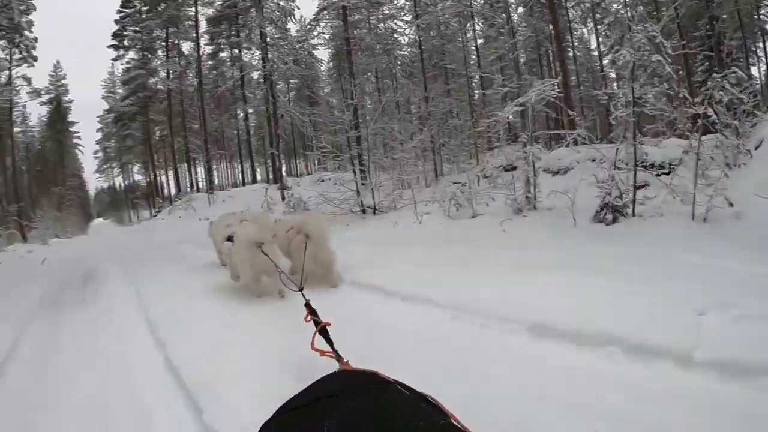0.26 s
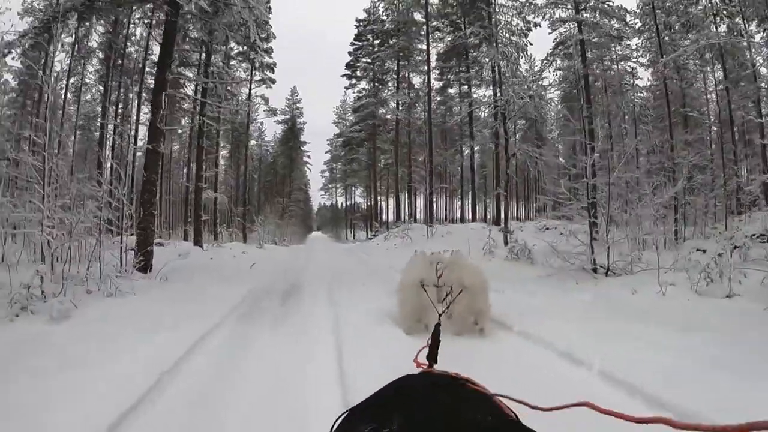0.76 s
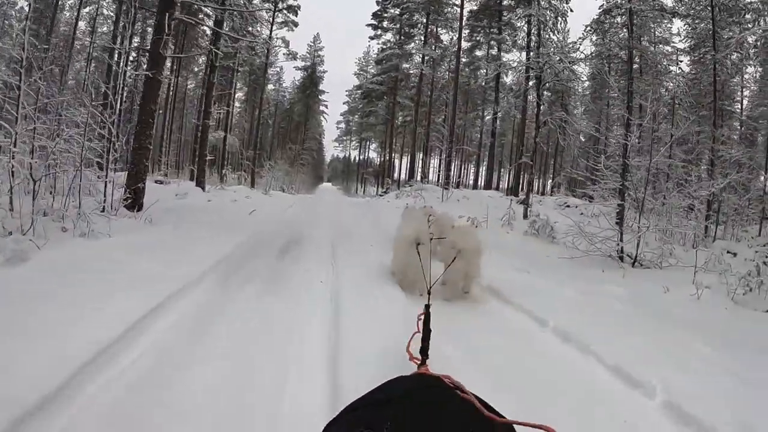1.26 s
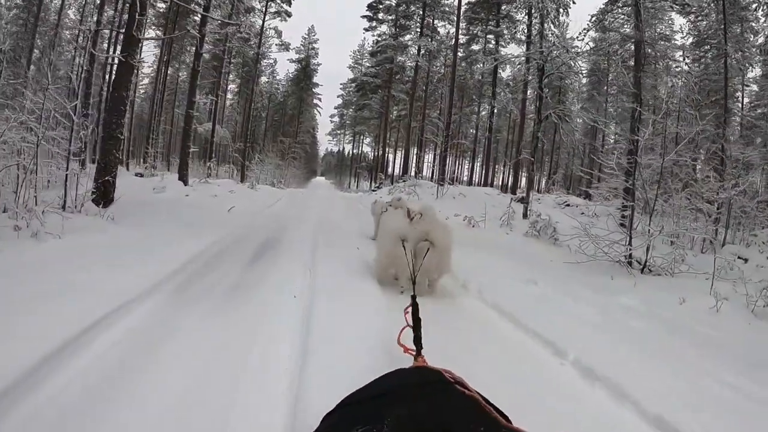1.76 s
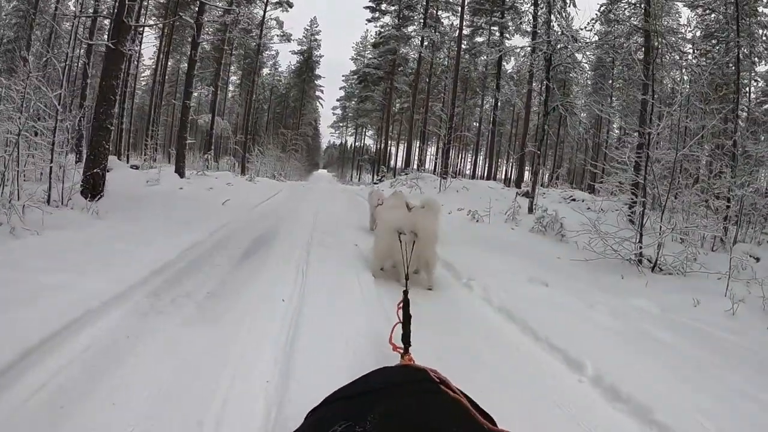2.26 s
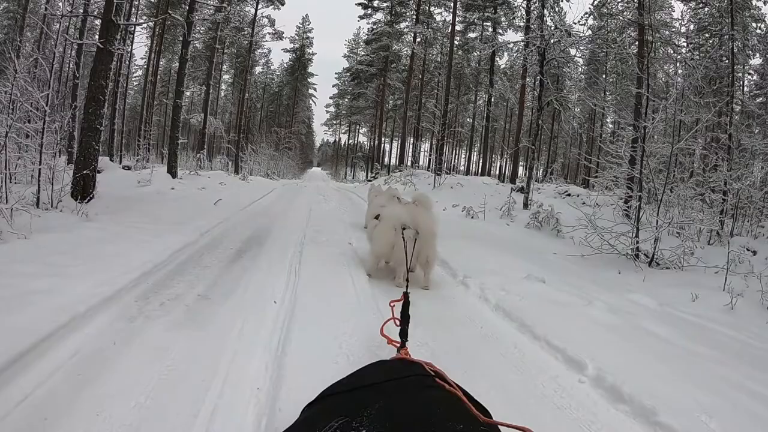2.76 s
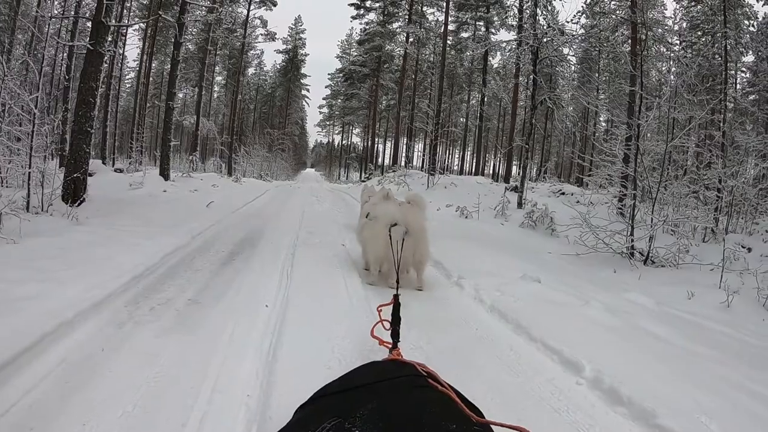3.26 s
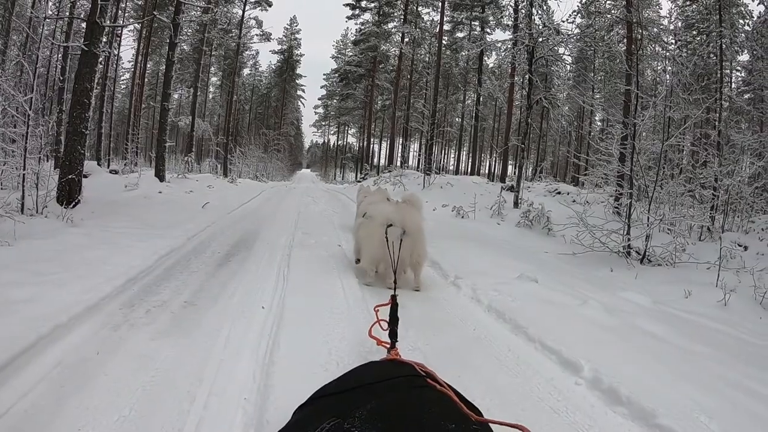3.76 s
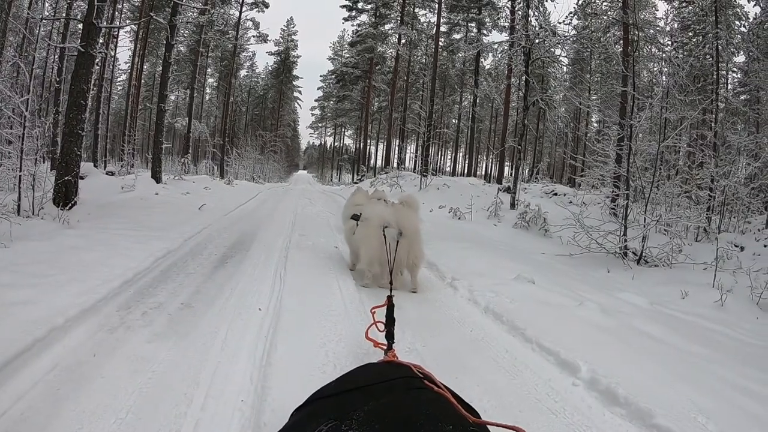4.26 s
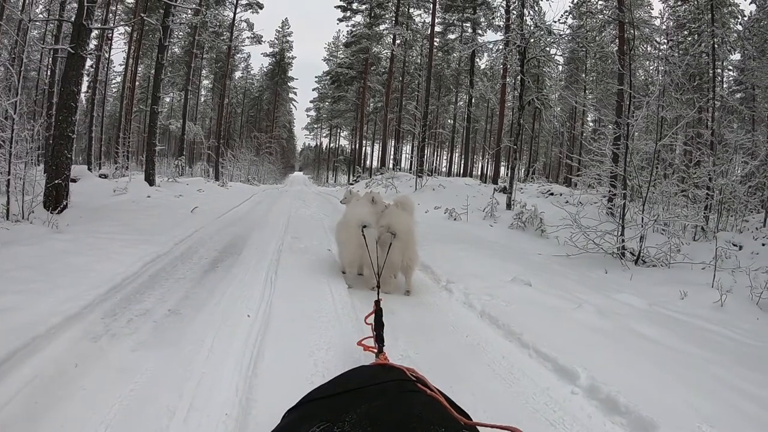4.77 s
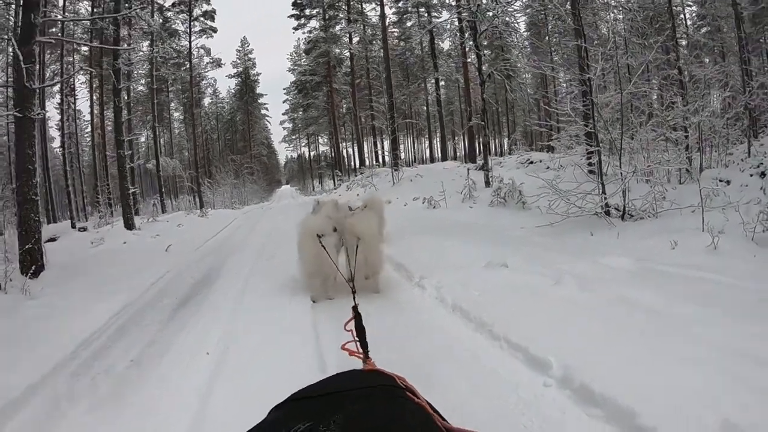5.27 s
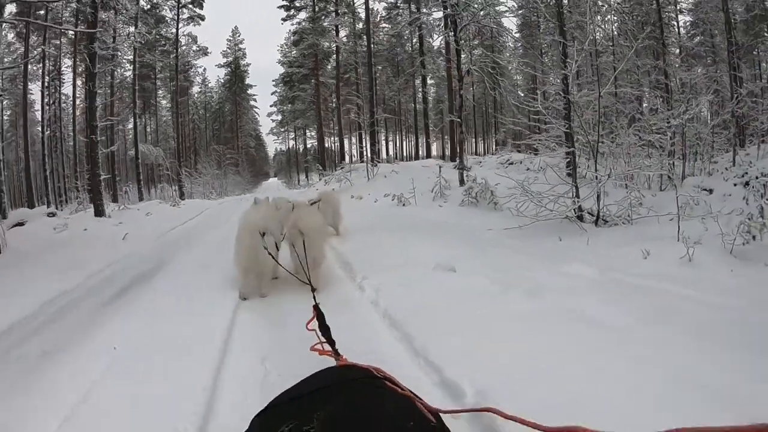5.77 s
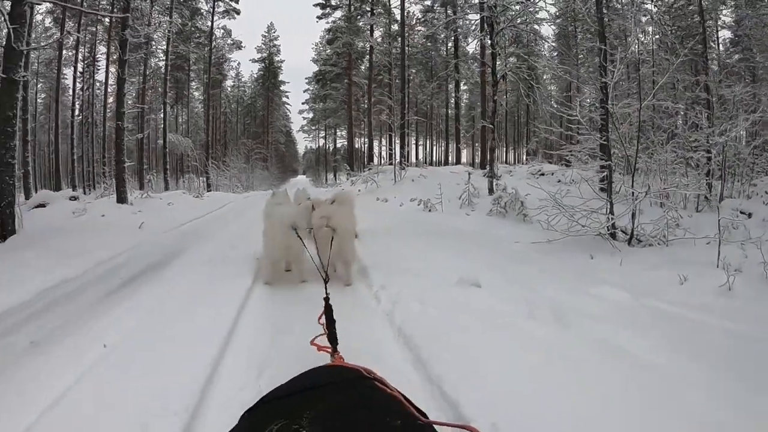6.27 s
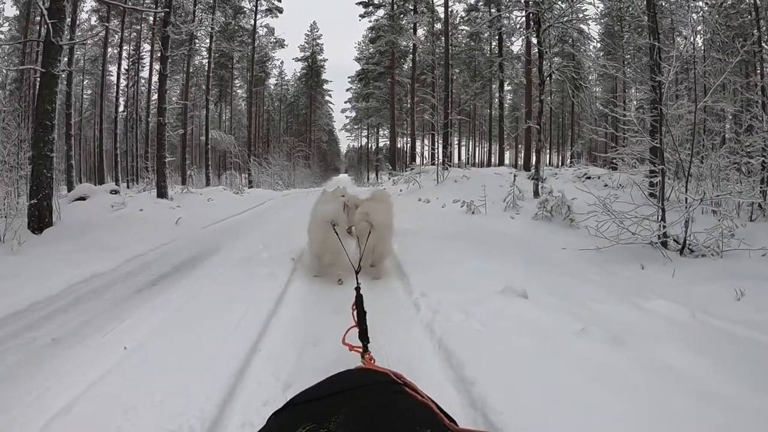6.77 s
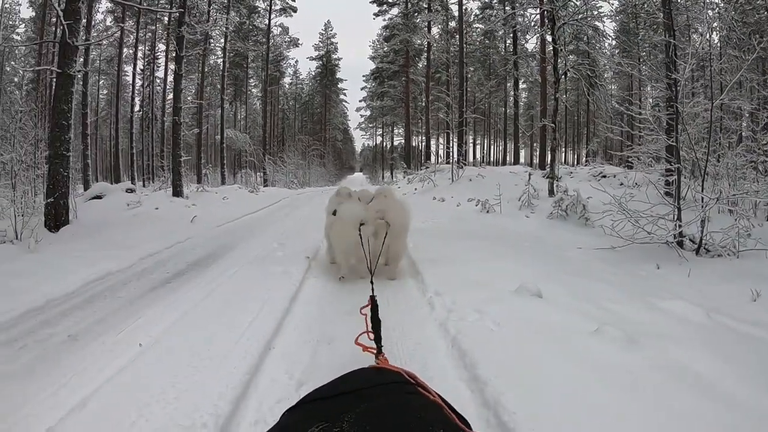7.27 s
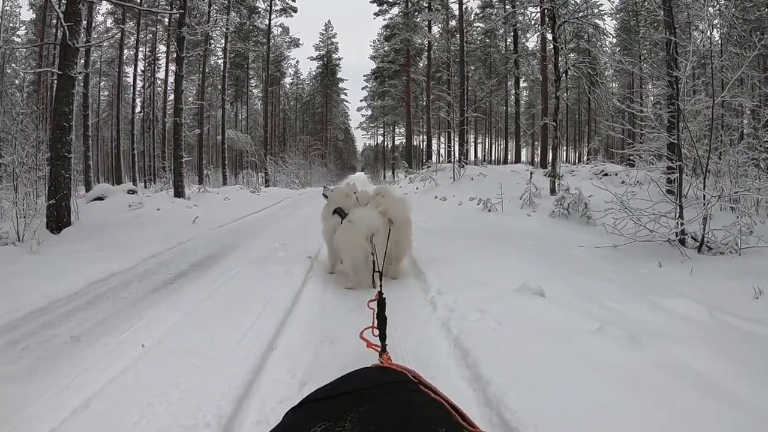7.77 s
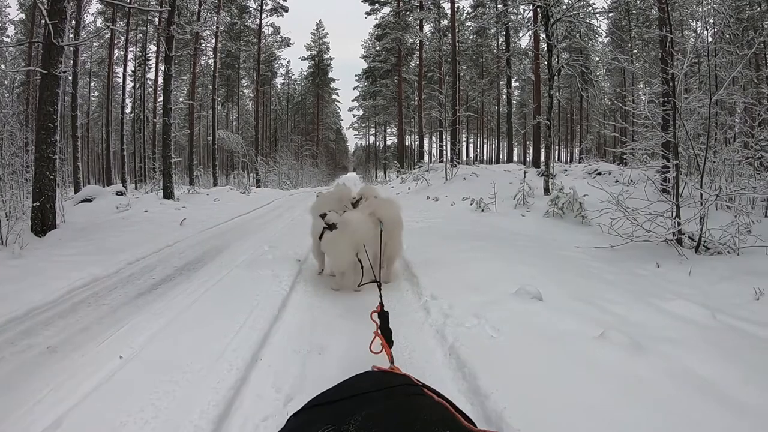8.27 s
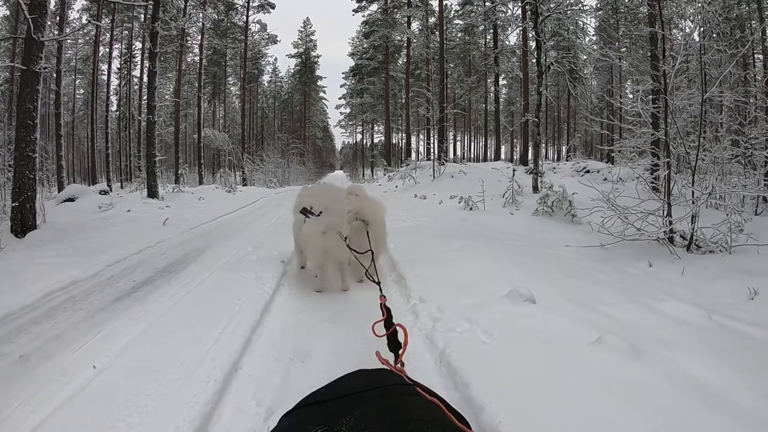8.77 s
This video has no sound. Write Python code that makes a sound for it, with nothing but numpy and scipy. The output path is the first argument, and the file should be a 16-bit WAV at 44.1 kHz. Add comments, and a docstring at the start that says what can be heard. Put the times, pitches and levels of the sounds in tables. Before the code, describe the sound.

Close, dry mono sound from a sled on packed forest snow, with no echo and barely audible air. At 0-0.5 s the runners grind and hiss strongly, with a brief snow squeak, creaking and a deep deck boom. Hollow knocks and a sharper crack hit around 0.7 s; short scrapes follow near 1 and 1.3 s. At 1.8-2.2 s come a thump, hollow knock, tick and small metallic clink. Around 3 s, dry knocks, a crack and woody stick-slip creaks cluster. From 3.2 to 4.9 s friction is thin, with brief bites and light bumps. It swells at 5.3-6.2 s with rough low snow groans and booming scrapes. A creak sounds near 6.5 s, then the loudest splitting cracks and thuds at 7.1-7.3 s. Afterwards it quiets: a tiny brush at 7.8, soft knock at 8, tick and clink at 8.2, final knock and scuff around 8.7.

```python
"""Sled runners grind and hiss over packed snow on a forest road, pulled by two dogs and heard from the sled.
Friction is filtered random grains of breaking snow; their chatter drives damped modes of deck and frame.
Bumps are pulse trains that boom in the deck and rock the load. Short narrow bands of rough noise are
snow groans and squeaks, the hollow bodies of two knocks and a high brushing rub. The frame creaks by
stick-slip, and knocks and cracks as rasps drive its modes; towline fittings tick and clink in faint air."""
import sys
import numpy as np
from scipy import signal
from scipy.fft import rfft, irfft, next_fast_len
from scipy.io import wavfile

SR = 44100
rng = np.random.default_rng(int(sys.argv[2]) if len(sys.argv) > 2 else 0)


def int16_out(signal):
    """Quantize to a 16-bit WAV file."""
    q = np.round(np.clip(np.atleast_2d(signal).T, -1, 1) * 32767)
    wavfile.write(sys.argv[1], SR, q.astype(np.int16))


N = 398223
T = np.arange(N) / SR  # time in s

# modes of the deck: f/Hz, width/Hz, relative level/dB
DECK_MODES = [(137.4, 3.4, -3.5), (157.9, 13.2, 3.5), (184.8, 12.4, 12), (206.1, 8.9, 8), (266, 17, -24)]
# modes of the hollow frame: f/Hz, width/Hz, relative level/dB
FRAME_MODES = [(295.5, 43, 6), (480.2, 59.6, 6.5), (596.7, 19.2, 7), (703, 4.9, -1)]
# modes of the runners: f/Hz, width/Hz, relative level/dB
RUNNER_MODES = [(1336, 216, 6.3), (1668, 37, 4), (1830, 46, 3.2)]
# modes of the tubes: f/Hz, width/Hz, relative level/dB
TUBE_MODES = [(3953, 120, -0.84), (4400, 160, -0.69), (5920, 170, -2.5)]
# rocking of the load on its springy frame: f/Hz, width/Hz, relative level/dB
ROCK_MODES = [(36, 7, 0)]
# spectrum of a dry snap: f/Hz, relative level/dB per Hz
SNAP_SPECTRUM = [(300, 11.5), (1900, 13.5), (3100, 5), (4400, 5.5), (9000, -8), (12000, -63)]


def gain_of(db):
    """Level to amplitude: 20 dB is a factor of ten."""
    return 10 ** (np.asarray(db) / 20)


def evened(x):
    """Normalises the mean power: rms 1."""
    return x / np.sqrt(np.mean(x ** 2) + 1e-20)


def peaked(x):
    """Normalises the greatest excursion: peak 1."""
    return x / (abs(x).max() + 1e-20)


def add(mix, s, sound):
    """Superposes a sound from time s on, or from 0 if s is negative."""
    part = mix[max(round(s * SR), 0):][:len(sound)]
    part += sound[:len(part)]


def colour(x, points, size=4096):
    """Minimum-phase filtering: the given spectrum from a causal response, so that attacks stay sharp."""
    hz, db = np.transpose(points)
    log_hz = np.log(abs(np.fft.fftfreq(size, 1 / SR)) + 1)
    log_gain = np.log(gain_of(np.interp(log_hz, np.log(hz), db)))
    # the phase follows from the log gain by the Hilbert transform
    taps = np.fft.ifft(np.exp(np.conj(signal.hilbert(log_gain)))).real
    return signal.oaconvolve(x, taps[:size // 2])[:len(x)]


def ring(x, modes, size=12000):
    """Modal resonance: the force x drives damped modes; above the top mode inertia limits the motion."""
    t = np.arange(size) / SR
    response = np.zeros(size)
    for hz, width, db in modes:
        decay = np.exp(-np.pi * width * t)
        response += gain_of(db) * width * decay * np.cos(2 * np.pi * hz * t)
    inertia = signal.butter(2, min(1.5 * modes[-1][0], SR / 3), fs=SR)
    return signal.oaconvolve(x, signal.lfilter(*inertia, response))[:len(x)]


def rattle(x, size=1500):
    """High modal density: many close, short-lived upper modes smear each click and comb its spectrum."""
    decay_s = 0.005
    tail = rng.standard_normal(size) * np.exp(-np.arange(size) / SR / decay_s)
    response = gain_of(-4) * tail / np.sqrt(decay_s * SR / 2)
    response[0] = 1  # the direct click
    return signal.oaconvolve(x, response / np.linalg.norm(response))[:len(x)]


def wander(fast_hz, size=N):
    """Band-limited random process, about rms 1, with changes mostly near and below fast_hz."""
    span = next_fast_len(max(size, SR))
    ratio = np.fft.rfftfreq(span, 1 / SR) / fast_hz
    spectrum = rfft(rng.standard_normal(span)) * ratio / (1 + ratio ** 4)
    return evened(irfft(spectrum, span))[:size]


def grains(per_s, spread_db):
    """Shot noise of snow crystals giving way: random clicks, a few of them much larger."""
    height = gain_of(spread_db * np.minimum(rng.exponential(1, N), 4))
    return evened(height * rng.choice([-1., 1.], N) * (rng.random(N) < per_s / SR))


def shifting(force, modes):
    """Moving excitation: the contact point shifts along the runner, so the driven modes take turns."""
    return evened(sum(ring(force, [mode]) * gain_of(3.5 * wander(fast_hz=9)) for mode in modes))


def ride():
    """Incoherent sources add in power: glide, scrapes and swishes give boom, grinding and hiss amplitudes."""
    # glide under everything: t/s, deck boom level/dB (lowered in runners), grinding level/dB
    glide = [(0.0, -24, -48), (0.9, -37, -52), (1.6, -29, -45), (2.1, -29, -48.5), (2.4, -40.5, -57.5),
             (2.95, -29, -53), (3.24, -47, -66.5), (3.499, -55.5, -61.5), (3.8, -43.5, -59.5),
             (4.451, -51, -57.5), (4.96, -30, -53), (5.41, -37, -56.5), (5.8, -26, -47), (6.08, -30.5, -51),
             (6.8, -43.5, -62.5), (7.27, -25.5, -48.5), (7.41, -48.5, -65.5), (7.749, -55, -64),
             (8.1, -39.5, -56), (9.03, -46.5, -60)]
    # runners bite as the dogs pull: t/s, length/s, grinding level/dB, boom and hiss relative to it/dB
    scrapes = [(0.0, 0.26, -42.5, 3, -11), (0.152, 0.26, -39.5, 21, -6), (0.971, 0.14, -45.5, 16, -3.5),
               (1.323, 0.21, -43.5, 15, -10.5), (2.642, 0.22, -50, -9, -4), (3.628, 0.26, -49.5, 6, -5),
               (4.009, 0.071, -48.5, 12, -4.5), (4.228, 0.068, -46, 16, -9), (4.44, 0.03, -47, 25.5, -0.5),
               (4.533, 0.25, -50.5, 10.5, -3.5), (5.516, 0.095, -45, 17, 3.5), (5.558, 0.19, -39, 22, -2.5),
               (6.467, 0.21, -51.5, 26.5, -9.5), (7.127, 0.16, -38.5, 6, -10), (8.266, 0.058, -46, 3, -7),
               (8.736, 0.16, -50.5, 11, -12)]
    # loose snow swishes aside: t/s at the middle, length/s at half amplitude, hiss level/dB
    swishes = [(0.355, 0.17, -40.5), (3.35, 0.11, -52), (4.18, 0.17, -54), (6.166, 0.11, -53),
               (7.814, 0.036, -41.5)]
    glide_hiss_db = -5.5  # loose snow hisses in step with the grinding
    bite_s, sag_db_per_s, release_s = 0.013, 11, 0.021  # quick onset, easing off, dying away
    swish_boom_db, swish_grind_db = -4, -7.5  # a swish also stirs the deck and grazes the packed snow
    s, boom_db, grind_db = np.transpose(glide)
    levels = (boom_db, grind_db, grind_db + glide_hiss_db)
    power = np.array([gain_of(np.interp(T, s, db)) for db in levels]) ** 2
    for start, length, db, boom_db, hiss_db in scrapes:
        t = np.arange(0, length + 6 * release_s, 1 / SR)
        release = np.exp(-np.maximum(t - length, 0) / release_s)
        push = np.minimum(t / bite_s, 1) * gain_of(db - sag_db_per_s * t) * release
        for layer, share_db in zip(power, (boom_db, 0, hiss_db)):
            add(layer, start, (gain_of(share_db) * push) ** 2)
    for middle, length, db in swishes:
        swell = gain_of(db) * signal.windows.hann(round(2 * length * SR))
        for layer, share_db in zip(power, (swish_boom_db, swish_grind_db, 0)):
            add(layer, middle - length, (gain_of(share_db) * swell) ** 2)
    return np.sqrt(power)


def runners():
    """Friction noise: snow breaks in clumps and shakes the modes of deck and frame; loose snow hisses."""
    # grinding of packed snow: f/Hz, relative level/dB per Hz
    crunch_spectrum = [(450, -3.5), (1900, -5.5), (2800, -28.5), (5000, -31.5), (11000, -66.5)]
    # hiss of loose snow: f/Hz, relative level/dB per Hz
    powder_spectrum = [(200, -12.5), (900, 7.5), (2100, 3), (3100, 0.5), (4100, 3), (6700, -0.5),
                       (10000, -22), (12000, -57)]
    hiss_tube_db = -11  # how much the sliding snow rings the tubes
    boom, grind, hiss = ride()
    grip = wander(fast_hz=31.0)  # the runners catch and let go
    shake = evened(ring(rng.standard_normal(N) * gain_of(2 * grip), DECK_MODES))
    rocking = evened(ring(rng.standard_normal(N), ROCK_MODES))
    sway = gain_of(-13.0 - 1.04 * T) * boom ** .5 * grind ** 0.21 * rocking  # the load slowly settles
    breaks = grains(per_s=3000, spread_db=1.5) * gain_of(2 * grip)
    # the frame joins runners and deck
    hollow = gain_of(-5.0) * np.sqrt(boom * grind) * shifting(breaks, FRAME_MODES)
    crumbs = grains(per_s=3200, spread_db=4.5) * gain_of(0.75 * grip)
    crunch = gain_of(-2.5) * evened(rattle(colour(crumbs, crunch_spectrum)))
    scrape = gain_of(-2.5) * shifting(breaks, RUNNER_MODES) + crunch
    loose = grains(per_s=18000, spread_db=5.0) * gain_of(1.03 * grip)
    powder = evened(colour(loose, powder_spectrum))
    powder += gain_of(hiss_tube_db) * shifting(breaks, TUBE_MODES)
    return gain_of(-3.0) * boom * shake + sway + hollow + grind * scrape + hiss * powder


def air():
    """Stationary broadband noise: the faint steady rush of the winter forest."""
    # f/Hz, relative level/dB per Hz
    air_spectrum = [(200, 11.5), (1500, -37.5), (5500, -23), (11000, -55)]
    return gain_of(-70.5) * evened(colour(rng.standard_normal(N), air_spectrum))


def creaks():
    """Stick-slip: a strained joint slips unevenly; each slip snaps and rings four wood modes that bend."""
    # t/s, rms level/dB, f/Hz of the main mode, length/s, top wood mode relative level/dB
    creak_events = [(0.0, -41.5, 1292, 0.46, -25), (2.914, -43, 1250, 0.011, -16),
                    (2.995, -42.5, 1320, 0.023, -14), (3.025, -40, 1352, 0.06, -13),
                    (3.079, -40.5, 1410, 0.051, -25), (4.643, -53, 1315, 0.73, -13),
                    (6.463, -39.5, 1357, 0.19, -12.5), (7.144, -33.5, 1283, 0.024, 3),
                    (7.986, -41, 1350, 0.03, -28)]
    slips_per_s = 450  # before its random variation
    width_hz = 154  # of each wood mode
    low_db, middle_db = -1.5, 4  # lowest mode relative to the main one, middle mode above the top one
    grit_db = -8  # dry grit of the slips, relative to the main mode
    bend = 0.0174  # share by which the pitch wanders with the strain
    out = np.zeros(N)
    for s, db, hz, length, top_db in creak_events:
        size = round(length * SR)
        pace = slips_per_s * gain_of(4 * wander(fast_hz=150, size=size))
        strength = gain_of(4 * rng.standard_normal(size) + 2 * wander(fast_hz=40, size=size))
        # a slip falls wherever the running count reaches a whole number
        slips = np.diff(np.floor(np.cumsum(pace) / SR), prepend=-1) * strength
        force = np.pad(slips * np.hanning(size + 2)[1:-1] ** .25, (0, SR // 40))
        wood = gain_of(grit_db) * evened(rattle(colour(force, SNAP_SPECTRUM)))
        for ratio, mode_db in [(0.35, low_db), (1, 0), (1.39, top_db + middle_db), (1.82, top_db)]:
            mode = [(ratio * hz, width_hz, 0)]
            wood = wood + gain_of(mode_db) * evened(ring(ring(force, mode), mode))
        # reading the sound at a varying speed bends its pitch
        strain = 1 + bend * wander(fast_hz=10.0, size=len(wood))
        bent = np.interp(np.cumsum(strain), np.arange(len(wood)), wood)
        add(out, s, gain_of(db) * evened(bent))
    return out


def rough_bands():
    """Narrow-band noise: slow random amplitudes on a sinking carrier make a rough tone that swells and fades."""
    # snow groans and squeaks, the hollow bodies of two knocks (1.996 s, 8.007 s), a high brushing rub (7.811 s):
    # t/s at the middle, level/dB, f/Hz at the middle, length/s at half amplitude
    band_events = [(0.119, -23.5, 1720, 0.0072), (0.11, -40, 1700, 0.17), (0.581, -47, 680, 0.063),
                   (1.996, -29.5, 679, 0.018), (5.287, -38.5, 640, 0.079), (5.69, -44, 580, 0.099),
                   (5.763, -38.5, 720, 0.063), (6.09, -38.5, 530, 0.035), (6.202, -36, 512, 0.05),
                   (7.811, -45.5, 5940, 0.024), (8.007, -28, 292, 0.029)]
    width_hz, sag_hz_per_s = 147, 600
    out = np.zeros(N)
    for s, db, hz, length in band_events:
        swell = signal.windows.hann(round(2 * length * SR))
        t = np.arange(len(swell)) / SR - length
        lowpass = signal.butter(2, width_hz / 2, fs=SR)
        rough = signal.lfilter(*lowpass, rng.standard_normal((2, SR)))[:, -len(t):]
        turn = 2 * np.pi * np.cumsum(hz - sag_hz_per_s * t) / SR
        band = rough[0] * np.cos(turn) + rough[1] * np.sin(turn)
        add(out, s - length, gain_of(db) * swell * evened(band))
    return out


def bumps(size=16000):
    """Forced vibration: a runner slips a few times in a row and booms the deck; the shove rocks the load."""
    # t/s, boom level/dB before the common gain, chatter f/Hz, rocking relative to the boom/dB
    bump_events = [(0.394, -18, 156, -2.5), (0.723, -20.5, 233.5, 3), (0.746, -25, 187, 4.5),
                   (1.781, -21.5, 210, -8), (2.119, -30, 217, -3.5), (3.098, -31, 193, -1.5),
                   (3.587, -25.5, 203, -16), (3.656, -29.5, 163, -14), (4.277, -29, 202, -17),
                   (5.847, -24, 239, -40), (5.977, -28, 199, -31), (6.594, -23, 186.6, -12),
                   (7.16, -25.5, 218, -27), (7.263, -20.5, 187, -7), (7.29, -20.5, 163.6, -18.5),
                   (7.949, -34, 206, -3.5)]
    # thud of the load against the deck: f/Hz, width/Hz, relative level/dB
    thud_modes = [(111.4, 6, 0)]
    thud_db = -5.5  # relative to the rocking
    judder_s = 0.029  # how long a runner chatters on a bump
    out, t = np.zeros(N), np.arange(size) / SR
    load = np.sin(np.pi * np.minimum(t / judder_s, 1))
    shove = t * np.exp(-t / 0.021)
    thud = peaked(ring(np.diff(shove, prepend=0), thud_modes))
    rocking = peaked(ring(shove, ROCK_MODES)) + gain_of(thud_db) * thud
    for s, db, hz, rock_db in bump_events:
        slips = load * np.exp(5.6 * np.cos(2 * np.pi * hz * t))  # narrow pulses at the chatter rate
        boom = peaked(ring(slips, DECK_MODES))
        add(out, s, gain_of(db) * (boom + gain_of(rock_db) * rocking))
    return gain_of(9.5) * out  # common gain


def rasp(rise_s, slip_s, size=6000):
    """Transient friction: a joint lets go in a few milliseconds of rough slipping, with a faint tail."""
    t = np.arange(size) / SR
    decay = np.exp(-t / slip_s) + gain_of(-35.0) * np.exp(-t / 0.024)
    return rng.standard_normal(size) * (1 - np.exp(-t / rise_s)) * decay


def blow():
    """Modal response to a rasp: hollow frame and deck, the runners, and a dry snap that rings the tubes."""
    rise_s, slip_s = 0.0013, 0.0079  # a loose joint rasps a little longer than a tight one
    snap_slip_s = 0.0035  # the dry snap is over before the rest of the rasp
    snap_tube_db = -13  # how much a snap rings the tubes
    force = rasp(rise_s, slip_s)
    hollow = peaked(ring(force, FRAME_MODES)) + gain_of(2.0) * peaked(ring(force, DECK_MODES))
    runner = peaked(ring(np.diff(force, prepend=0), RUNNER_MODES))  # a sharp blow favours the higher modes
    snap = peaked(rattle(colour(rasp(rise_s, snap_slip_s), SNAP_SPECTRUM)))
    snap = snap + gain_of(snap_tube_db) * peaked(ring(force, TUBE_MODES))
    return hollow, runner, snap


def knocks():
    """Impact on coupled parts: loose joints knock in the hollow frame and runners, with a dry snap."""
    # t/s, level/dB of the blow, dry snap relative to it/dB
    knock_events = [(0.552, -24.5, 1), (0.721, -17.5, -25), (0.738, -20.5, -8), (1.002, -25.5, -4),
                    (1.773, -21, -6.5), (1.993, -26.5, -9), (2.249, -23, -8.5), (2.941, -25, 5),
                    (2.965, -25, -25), (3.579, -25, -29), (4.244, -30.5, -1.5), (5.855, -25, -10),
                    (8.001, -39, -0.5), (8.637, -23.5, -13), (8.649, -30.5, 0)]
    runner_db = -10  # how much a knock rings the runners
    out = np.zeros(N)
    for s, db, snap_db in knock_events:
        hollow, runner, snap = blow()
        add(out, s, gain_of(db) * (hollow + gain_of(runner_db) * runner + gain_of(snap_db) * snap))
    return out


def cracks():
    """Sudden release of strain: a tight joint gives way in a hard split that rings the wood around it."""
    # the strained frame cracks as the sled lurches: t/s, level/dB before the shares below
    crack_events = [(0.724, -26), (0.739, -16.5), (2.94, -20), (6.623, -18.5), (7.102, -24), (7.161, -8.5),
                    (7.208, -15), (7.241, -16), (7.254, -7), (7.273, -8.5)]
    # wood around the joint: f/Hz, width/Hz, relative level/dB
    joint_modes = [(1240, 170, 14), (1730, 79, -16), (1864, 41, 0)]
    # splitting sound: f/Hz, relative level/dB per Hz
    split_spectrum = [(900, -20.5), (1300, 1.5), (1950, 1.5), (2900, -21), (4200, -11.5), (6500, -19.5),
                      (9000, -37), (12000, -80)]
    hollow_db, joint_db, split_db = -7.5, -10, -2.5
    out = np.zeros(N)
    for s, db in crack_events:
        hollow = blow()[0]
        force = rasp(rise_s=0.00033, slip_s=0.0044)
        wood = peaked(ring(force, joint_modes))
        split = peaked(rattle(colour(force, split_spectrum)))
        crack = gain_of(hollow_db) * hollow + gain_of(joint_db) * wood + gain_of(split_db) * split
        add(out, s, gain_of(db) * crack)
    return out


def ticks():
    """Transmitted impact: the towline fittings snap taut, and the frame answers with a hollow share."""
    # t/s, level/dB of the snap
    tick_events = [(1.972, -23), (2.12, -29), (2.803, -31), (2.958, -25), (4.429, -30.5), (6.265, -31),
                   (6.455, -33.5), (7.041, -35), (7.927, -34), (8.232, -24.5)]
    hollow_db = -4
    out = np.zeros(N)
    for s, db in tick_events:
        hollow, _, snap = blow()
        add(out, s, gain_of(db) * (snap + gain_of(hollow_db) * hollow))
    return out


def clinks():
    """Impulse response: the steel hook on the towline is tapped and rings briefly."""
    # t/s, peak level/dB
    clink_events = [(1.973, -31), (5.319, -42.5), (6.865, -49), (8.23, -34)]
    # f/Hz, width/Hz, relative level/dB
    hook_modes = [(8200, 85, 15)]
    out = np.zeros(N)
    tap = peaked(ring(signal.unit_impulse(SR // 4), hook_modes))
    for s, db in clink_events:
        add(out, s, gain_of(db) * tap)
    return out


def scene():
    """Superposition of direct sound: everything is close and dry, since snow gives no echo."""
    steady_and_rough = runners() + air() + creaks() + rough_bands()
    blows = bumps() + knocks() + cracks() + ticks() + clinks()
    return (steady_and_rough + blows)[None]


def record(dry):
    """Band limits and soft saturation: sheds the deepest rumble, rounds off hard blows, cuts the top."""
    x = signal.sosfilt(signal.butter(2, 24, "highpass", fs=SR, output="sos"), dry)
    x = .75 * np.tanh(x / .75)
    edge_hz = 11600
    lowpass = signal.firwin(255, edge_hz, window=("kaiser", 7), fs=SR)
    return signal.oaconvolve(x, lowpass[None], "same")


dry = scene()
out = record(dry)
int16_out(out)
```